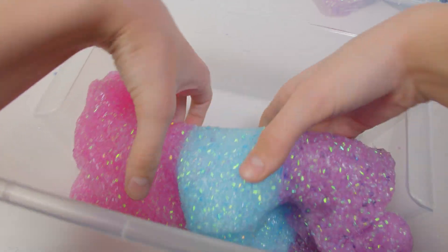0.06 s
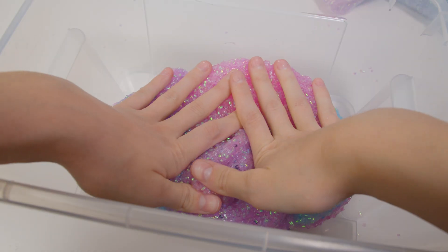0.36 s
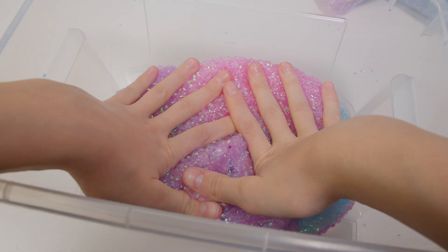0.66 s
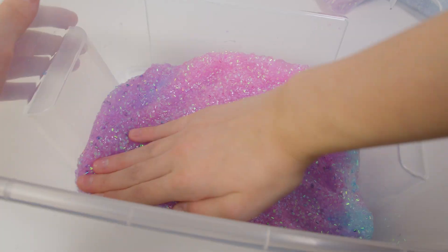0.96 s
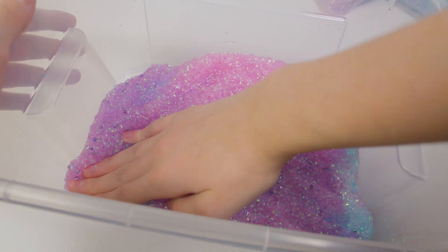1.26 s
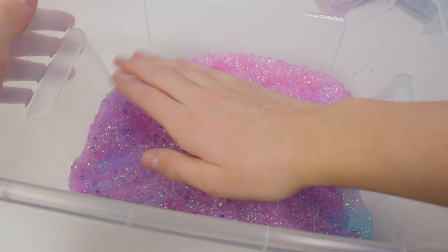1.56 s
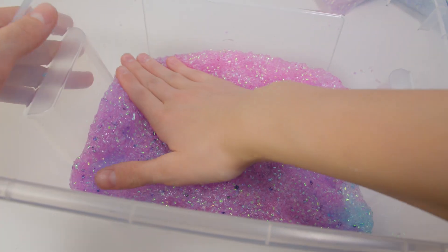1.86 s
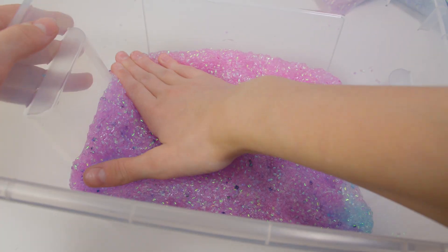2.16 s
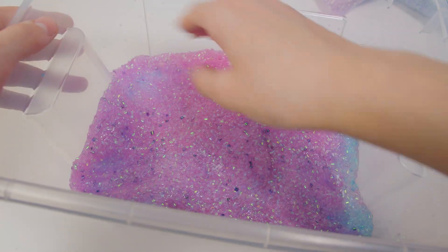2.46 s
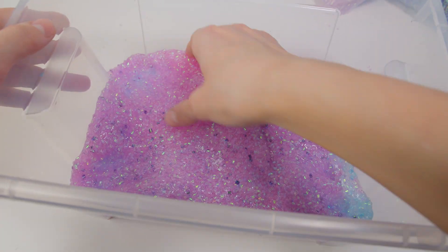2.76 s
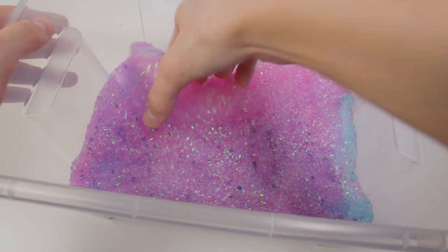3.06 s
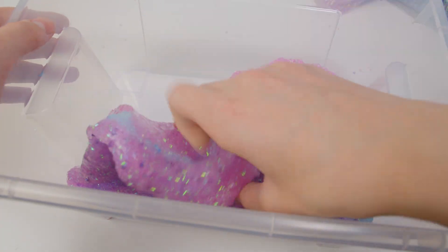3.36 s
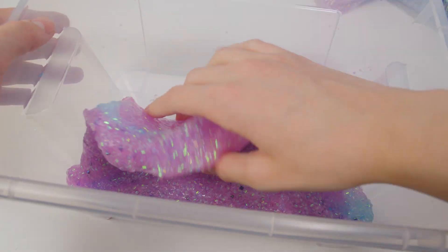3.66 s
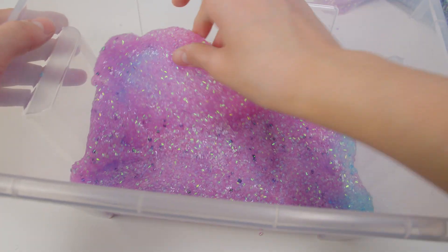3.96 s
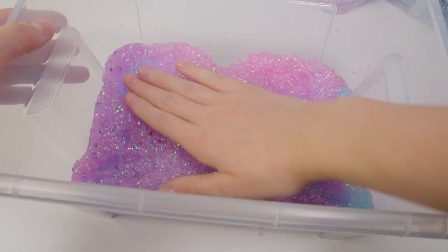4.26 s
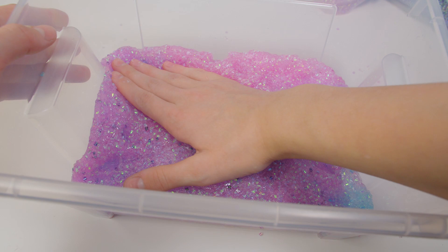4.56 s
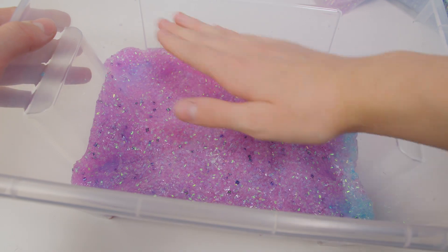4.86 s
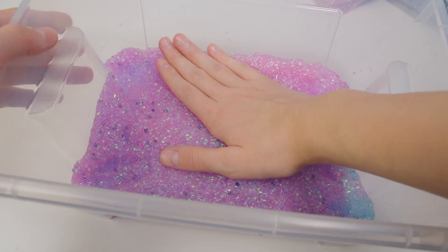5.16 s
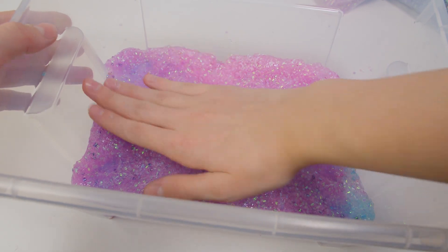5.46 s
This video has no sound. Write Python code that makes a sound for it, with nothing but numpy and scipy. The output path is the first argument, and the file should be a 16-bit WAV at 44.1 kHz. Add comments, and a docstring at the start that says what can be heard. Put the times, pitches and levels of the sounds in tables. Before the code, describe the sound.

Hands press and fold bead-filled slime in a plastic tub, making wet squelches, crisp crackles, sharp little pops and soft thumps.

```python
"""A loud, popping squelch of bead-filled slime, which breaks off abruptly after a quarter second.
Hands then press, fold and peel the slime in a plastic tub, close to a stereo microphone in a small room.
Sticky threads tear in dense crackles, air squelches out of the folds, small bubbles snap and big
pockets pop as resonating cavities. Pushed against the table, the tub booms in its damped modes.
Beneath it all lie a low rumble, a faint hiss and, briefly, a hum."""
import sys
import numpy as np
from scipy import signal
from scipy.fft import rfft, irfft
from scipy.io import wavfile
from scipy.ndimage import uniform_filter1d, map_coordinates

SR = 44100
rng = np.random.default_rng(int(sys.argv[2]) if len(sys.argv) > 2 else 0)


def store_wav(level_fs):
    """Save 16-bit WAV to argv[1]."""
    pcm = np.round(np.clip(np.atleast_2d(level_fs), -1, 1) * 32767)
    wavfile.write(sys.argv[1], SR, pcm.T.astype(np.int16))


N = 251811
TIME = np.arange(N) / SR
FOLD_HZ = 770.8  # pitch of a middling fold, which leaves the squelch bands unshifted

# the flat hand bearing down: (t/s, duration/s, crackle level/dB, moved mass level/dB)
PRESSES = [(0.243, 0.1, -60, -64), (0.359, 0.53, -65.5, -66), (1.02, 0.19, -60, -66.5),
           (1.874, .3, -70, -64), (4.32, .27, -59.5, -54), (5.058, 0.17, -63, -50)]


def undb(db):
    """Amplitude ratio of a level in decibels."""
    return 10 ** (np.asarray(db) / 20)


def unit(x):
    """Normalisation to rms 1."""
    return x / np.sqrt(np.mean(x ** 2))


def band(x, hz, octaves, order=2):
    """Butterworth band-pass around hz, its edges kept below the Nyquist frequency."""
    edges = [min(hz * 2 ** (-octaves / 2), SR / 3), min(hz * 2 ** (octaves / 2), SR / 2 - 1000)]
    return signal.sosfilt(signal.butter(order, edges, "band", fs=SR, output="sos"), x + 1e-18)


def add(track, s, sound):
    """Superposition of a sound on the track at time s."""
    i = max(int(s * SR), 0)
    track[i:i + len(sound)] += sound[:N - i]


def walk(per_s):
    """Slow random modulation: smoothed Gaussian steps, spread near 1."""
    k = int(SR / per_s)
    steps = np.repeat(rng.standard_normal(N // k + 1), k)
    return 1.3 * uniform_filter1d(uniform_filter1d(steps, k), k)[:N]


def swell(s, rise_s, hold_s, fade_s):
    """Exponential growth to 1 at time s, hold and decay; 20 dB per rise or fade time."""
    before, after = np.maximum(s - TIME, 0), np.maximum(TIME - s - hold_s, 0)
    return undb(-20 * (before / max(rise_s, 1e-3) + after / max(fade_s, 1e-3)))


def bend(x, ratio):
    """Resampling scales every frequency by a time-varying ratio."""
    return map_coordinates(x, [np.cumsum(ratio)], mode="mirror")


def air():
    """Ambient noise: rumble and faint hiss, weakly correlated between the channels."""
    # spectrum of still room air: (f/Hz, relative spectral level/dB)
    spectrum = [(12, -3), (22, 11.5), (35, -9.5), (50, 0), (80, -15), (130, -17.5), (300, -29), (700, -36),
                (2000, -38.5), (7500, -46), (10000, -45), (16000, -45)]
    hz, db = np.transpose(spectrum)
    colour = undb(np.interp(np.log(np.fft.rfftfreq(N, 1 / SR) + 1), np.log(hz), db))
    noise = rng.standard_normal((2, N)) + 0.18 * rng.standard_normal(N)
    return undb(-45) * unit(irfft(rfft(noise) * colour, N))


def room(x, wet_db, t60_low=0.25, t60_high=0.27, near_db=-13, near_s=0.0029, bass_db=6, break_s=.2345):
    """Convolution with a stereo impulse response: direct sound, tub-wall reflections, reverberation."""
    t = TIME[:SR // 2]
    noise = rng.standard_normal((2, len(t)))
    low, bass, full = (signal.sosfilt(signal.butter(1, hz, fs=SR, output="sos"), noise)
                       for hz in (1800, 260, 12000))
    low_tail = (low + undb(bass_db) * bass) * undb(-60 * t / t60_low)
    high_tail = (full - low) * undb(-60 * t / t60_high)
    tail = (low_tail + high_tail) * (t > .004)
    near = rng.standard_normal((2, len(t))) * np.exp(-t / near_s) * (t > .0006)
    response = (undb(wet_db) * unit(tail) + undb(near_db) * unit(near)) / np.sqrt(len(t))
    response[0, :2] += [0.1, 0.9]  # the direct sound reaches the left a fraction of a sample later
    response[1, 0] += 1
    first = TIME < break_s  # the opening scene breaks off here, echo and all, and the next scene begins
    echo = lambda part: signal.fftconvolve(part[None], response, axes=1)[:, :N]
    return echo(x * first) * first + echo(x * ~first)


def hum(glide_hz_per_s=28):
    """Frequency modulation: a faint low tone wavers and rises a little as it comes and goes."""
    # swells of the hum: (t/s, duration/s, f/Hz at time t, level/dB)
    tones = [(3.58, 0.22, 204, -54.5), (4.3, 0.19, 198.6, -64)]
    out = 0
    for s, length_s, hz, db in tones:
        pitch = (hz + glide_hz_per_s * (TIME - s)) * (1 + .01 * walk(24.6))
        tone = unit(np.sin(2 * np.pi * np.cumsum(pitch) / SR))
        out = out + undb(db) * swell(s, rise_s=0.31, hold_s=length_s, fade_s=0.11) * tone
    return out


def tub(onset_s=0.018):
    """Modal vibration: a soft push through the slime excites the tub's damped modes."""
    # modes of the tub: (f/Hz, relative level/dB, T60/s)
    modes = [(80.4, 2.5, 0.19), (108.9, -9.5, 0.13), (175.1, -9.5, 0.2), (245.4, -4.5, 0.077),
             (365, -18, 0.084)]
    # pushes against the table: (t/s, level/dB)
    thumps = [(0.016, -27), (0.127, -28.5), (0.201, -45), (1.414, -36), (1.828, -44), (3.011, -29),
              (3.211, -41), (4.012, -49), (4.241, -45), (4.33, -46), (4.679, -51), (5.369, -35.5),
              (5.459, -39)]
    t = TIME[:SR // 2]
    ring = sum(undb(db - 60 * t / t60) * np.sin(2 * np.pi * hz * t) for hz, db, t60 in modes)
    ring = ring * (1 - np.exp(-t / onset_s))
    out = np.zeros(N)
    for s, db in thumps:
        add(out, s, undb(db) * ring / np.abs(ring).max())
    return out


def bubble(hz, ring_ms, glide=0.044):
    """Cavity resonance: the oscillation swells and rings out, rising slightly in pitch; peak 1."""
    t = TIME[:SR // 24]
    age = t * 1000 / ring_ms
    ring = age * np.exp(-age) * np.sin(2 * np.pi * hz * t * (1 + glide * np.tanh(age / 10)))
    return ring / np.abs(ring).max()


def rip(hz, ring_ms, octaves, order=2):
    """Rupture of a film: an impulse, then the torn edge flutters as decaying band-limited noise."""
    t = TIME[:SR // 24]
    fade = np.exp(-t * 1000 / ring_ms)
    flutter = rng.standard_normal(len(t)) * fade
    flutter[0] = 1.83  # the impulse
    burst = band(flutter, hz, octaves, order=order)
    return .5 * burst * np.sqrt(np.sum(fade ** 2) / np.sum(burst ** 2))


def faint_snaps(per_s=24, centre_hz=6760, ring_ms=0.63, knock_db=-5.5, max_count=32):
    """A random point process: rows for snaps(), scattered through each press above its crackle level."""
    rows = []
    for s, length_s, crackle_db, _ in PRESSES:
        draws = np.column_stack([rng.random(max_count), rng.uniform(-2.17, 2.15, (max_count, 2))])
        for when, size, pitch in draws[:round(per_s * length_s)]:
            db = crackle_db + 18 + 7 * size
            rows.append((s + when * length_s, db, centre_hz * 2 ** (0.57 * pitch), ring_ms, knock_db))
    return rows


def snaps():
    """Broadband transients: small taut bubbles burst with a bright tick and a dull knock; a few ring."""
    # the clearest bursts: (t/s, level/dB, f/Hz, decay time/ms, knock level/dB re tick)
    bursts = [(.2325, -22, 10600, 1.2, -21), (.2525, -32.5, 8700, 2.1, -6), (.403, -37, 10000, 0.59, -7),
              (.415, -53, 5000, 2.2, 15), (.577, -46.5, 7000, 0.99, 0), (.644, -36, 9070, 0.41, -21),
              (.817, -32.5, 8400, .74, -18), (.8838, -27, 6500, 1.4, -1), (1.001, -42.5, 9000, 0.55, 4),
              (1.038, -25.5, 9000, 1.5, -15), (1.116, -23.5, 10000, 2.8, -6.5),
              (1.155, -24.5, 6900, 0.59, -20), (1.767, -34.5, 7240, 0.42, -15),
              (1.886, -29, 7450, 0.63, -12.5), (1.927, -41, 6970, .7, -19), (1.989, -41, 8000, .55, -20),
              (2.047, -38.5, 7640, 0.4, -15), (2.194, -44, 6960, .45, 0.5), (2.665, -34, 6030, 1.3, -15),
              (2.7115, -20, 7700, 0.74, -29), (2.811, -25, 8800, .99, -11), (2.8313, -19, 10280, 0.67, -4),
              (3.032, -15, 10500, 0.394, -29), (3.08, -24, 7060, 1.8, 1), (3.1058, -14, 7850, 0.86, -5),
              (3.19, -30, 6010, 1, -5), (3.422, -34.5, 9800, 1.8, -26), (3.95, -31, 9000, 0.62, -16),
              (4.382, -35.5, 5953, 1.2, -22), (4.407, -30.5, 9080, 3.1, -32),
              (4.418, -31.5, 9500, 1.5, -34), (4.4655, -25, 8220, 1.9, -40), (4.5, -30, 9500, 0.76, -21),
              (4.521, -34, 8590, 1.24, -19), (4.581, -33, 7900, 0.48, -11.5),
              (4.611, -29.5, 9517, 0.77, -23), (4.639, -37.5, 7000, 0.62, -3),
              (4.7635, -22, 10090, 0.95, -22), (5.105, -3.5, 9436, 0.77, -28),
              (5.3252, -23, 5920, 1.1, -15), (5.35, -20.5, 4935, 3.9, -32), (5.4563, -31, 4502, 0.49, -20),
              (5.653, -26, 7200, 2.27, -35)]
    # tiny bubbles with a clear pitch: (t/s, level/dB, f/Hz, decay time/ms)
    blips = [(2.843, -35.5, 3580, 2.2), (2.989, -38, 3805, 1.6), (3.151, -35, 3800, 1.6),
             (4.618, -51.5, 1780, 1.3)]
    out = np.zeros(N)
    for s, db, hz, ring_ms, knock_db in list(bursts) + faint_snaps():
        add(out, s, undb(db) * rip(hz, ring_ms, octaves=1.14))
        add(out, s, undb(db + knock_db) * rip(2200, 1.4 * ring_ms, octaves=4.84))
    for s, db, hz, ring_ms in blips:
        add(out, s, undb(db) * bubble(hz, ring_ms))
    return out


def pops():
    """Impulsive excitation: a bursting air pocket rings, with a flap of loose slime and a wet edge."""
    # air pockets: (t/s, level/dB, f/Hz, decay time/ms, relative level of the wet edge/dB)
    pockets = [(.075, -17, 670, 1.25, -11), (.083, -11, 690, 0.54, -22), (.125, -6, 676, 0.97, -9),
               (.176, -13.5, 580, 1.14, -1.5), (.216, -12.5, 503, 0.27, -10), (.377, -47.5, 870, 0.8, -1),
               (.826, -37, 1530, 0.44, 0), (2.486, -40.5, 880, .79, -6), (2.552, -31.5, 880, 1.5, 1),
               (2.5573, -24, 613, 1.2, -1), (2.712, -35, 976, 2.8, -21), (2.729, -37, 1110, 3.2, -17),
               (2.75, -31.5, 1030, 1.7, -9), (2.766, -46, 1235, 1.3, -12.5),
               (3.0211, -22, 520.4, 0.79, -24), (3.2141, -9, 747, 0.61, -34),
               (3.5453, -29.5, 594.4, 0.96, -36), (4.007, -23.5, 662.6, 1.05, -25),
               (4.346, -40.5, 641.5, 0.67, 1.5), (5.036, -32, 948, 1.15, -18),
               (5.107, -31.5, 1141, 0.51, -18), (5.164, -35.5, 1013, 1.24, -16),
               (5.324, -33, 940, 1.15, -13), (5.457, -20.5, 429.7, 0.26, -10.5),
               (5.637, -44.5, 811, 4, -21)]
    out = np.zeros(N)
    for s, db, hz, ring_ms, edge_db in pockets:
        add(out, s, undb(db - 0.5) * bubble(hz, ring_ms))
        add(out, s, undb(db - 2.5) * rip(hz * 0.72, 4.1 * ring_ms, octaves=2.54, order=4))  # flap
        add(out, s, undb(db + edge_db) * rip(2220, 1.64, octaves=1.75))
    return out


def hollow(x):
    """Cavity modes: the air between hand and tub adds narrow resonances."""
    # resonances of the hollow: (f/Hz, bandwidth/Hz, gain/dB)
    modes = [(1559.7, 70, 4), (2020, 43, -14.5), (3125, 67, -1), (3760, 14, -4.5), (4175, 44, -6.5),
             (5320, 170, -16.5)]
    return x + sum(undb(db) * signal.lfilter(*signal.iirpeak(hz, hz / width, fs=SR), x)
                   for hz, width, db in modes)


def grains(bands, per_s, spread_db, octaves):
    """Shot noise: random impulses, per_s in each band, ring briefly near the band's centre; rms 1."""
    out = 0
    for hz, db in bands:
        size = undb(spread_db * np.minimum(rng.standard_exponential(N), 4)) * rng.choice([-1, 1], N)
        clicks = size * (rng.random(N) < per_s / SR)
        # the hand feeds energy in steadily, so the bursts of each moment share it
        clicks = clicks / np.sqrt(uniform_filter1d(clicks ** 2, SR // 40) + 1e-3)
        out = out + undb(db) * unit(band(clicks, hz, octaves, order=3))
    return unit(out)


def effort(air_lag_s=0.0024, mass_lag_s=0.0052):
    """Incoherent sources add in power: envelopes of tearing, air flow and moved mass, and fold pitch."""
    # strokes of the hand that pull or fold the slime:
    # (t/s, rise/s, hold/s, fade/s, tearing level/dB, air level/dB, mass level/dB, f/Hz of the fold)
    strokes = [(0, 0.026, 0.062, 0.049, -60.5, -33, -34.5, 711),
               (0.083, 0.073, 0.13, 0.018, -54, -35.5, -35, 668.6),
               (1.391, 0.055, 0.0085, 0.22, -49, -47.5, -49, 762.5),
               (1.817, 0.042, 0.011, 0.0788, -57.5, -39.5, -42, 790.4),
               (2.347, 0.052, 0.018, 0.083, -42.5, -49, -56, 759.5),
               (2.375, 0.0349, 0.0078, 0.0801, -41, -37, -41.5, 742.7),
               (2.553, 0.0075, .005, 0.085, -51.5, -41, -39.5, 707.5),
               (2.725, 0.078, 0.048, 0.075, -45, -36, -47, 899.2),
               (2.845, 0.067, 0.013, .16, -45, -54.5, -60.5, 860),
               (2.973, .05, 0.039, 0.14, -39.5, -37.5, -43, 683.5),
               (3.11, .09, 0.024, .1, -38, -39, -42.5, 730.7),
               (3.21, 0.0394, 0.021, 0.097, -44, -41.5, -41.5, 801),
               (3.435, 0.014, .005, 0.055, -50, -47, -46.5, 753.7),
               (3.539, 0.0075, 0.0025, 0.11, -71.5, -52, -44, 618),
               (3.667, 0.015, 0.0035, 0.025, -51, -53, -57, 921),
               (3.972, 0.18, 0.051, 0.065, -51, -54, -50, 681.6),
               (4.017, 0.038, 0.028, .1, -53.5, -36, -34, 638),
               (4.162, 0.0797, 0.0095, 0.115, -60, -64.5, -48, 647),
               (4.776, 0.033, 0.036, 0.048, -40.5, -48.5, -52, 738.6),
               (4.812, 0.052, 0.0087, .075, -54, -32.5, -40.5, 772),
               (4.948, .04, 0.0056, 0.088, -64, -54, -44.5, 628.5),
               (5.034, 0.016, 0.0057, 0.088, -58, -45.5, -58, 904),
               (5.165, 0.011, 0.0036, 0.057, -57.5, -48.5, -40, 723.5),
               (5.335, 0.032, 0.021, 0.069, -39, -41, -43.5, 694.4),
               (5.449, 0.0056, .003, .11, -61, -49, -38.5, 678),
               (5.648, 0.067, 0.006, 0.07, -58.5, -49, -52, 745)]
    # trapped air hissing out of a broken bubble: (t/s, level/dB)
    vents = [(0.883, -64.5), (1.115, -47), (4.465, -59), (5.104, -50.5), (5.653, -52.5)]
    tear, air_flow, mass, fold_shift = np.zeros((4, N))
    for s, rise_s, hold_s, fade_s, tear_db, air_db, mass_db, fold_hz in strokes:
        # threads tear first, then air escapes, then the mass follows
        tear += (undb(tear_db) * swell(s, rise_s, hold_s, fade_s)) ** 2
        puff = (undb(air_db) * swell(s + air_lag_s, rise_s, hold_s, fade_s)) ** 2
        mass += (undb(mass_db) * swell(s + mass_lag_s, rise_s, hold_s, fade_s)) ** 2
        air_flow += puff
        fold_shift += puff * (fold_hz - FOLD_HZ)
    for s, length_s, crackle_db, mass_db in PRESSES:
        weight = swell(s, rise_s=0.045, hold_s=length_s, fade_s=.15)
        tear += (undb(crackle_db) * weight) ** 2
        air_flow += (undb(crackle_db - 4) * weight) ** 2
        mass += (undb(mass_db) * weight) ** 2
    for s, db in vents:
        tear += (undb(db) * swell(s, rise_s=.005, hold_s=0.019, fade_s=0.1)) ** 2
    return np.sqrt(tear), np.sqrt(air_flow), np.sqrt(mass), FOLD_HZ + fold_shift / air_flow


def kneading(smack_air_share=0.31, drift_octaves=.14):
    """Modulated shot noise: threads tear, skin smacks, air squelches and the slime's mass shifts."""
    # band centres of those four sources, in that order: (f/Hz, relative level/dB)
    thread_bands = [(5500, -1.5), (6900, -6), (9100, 0.5), (10900, -0.5), (14000, -8.5)]
    smack_bands = [(1800, -3), (2300, 0), (3200, -2.5), (4100, 2.2)]
    squelch_bands = [(470, -1.5), (600, 5), (760, 4), (960, 5.5), (1220, -8), (1520, -0.5)]
    mass_bands = [(81, -3), (125, -6.5), (190, 0.5), (255, -3.5), (355, -7)]
    tear, air_flow, motion, fold_hz = effort()
    contact = tear ** (1 - smack_air_share) * air_flow ** smack_air_share  # where tearing meets air
    per_s = 450 + 1200 * np.sqrt(tear / tear.max())  # harder work tears more threads
    slip = undb(2.03 * walk(170) + 0.68 * walk(55))  # the slime lets go in jerks
    drift = 2 ** (drift_octaves * walk(18))  # the gaps under the fingers keep changing size
    crackle = tear * undb(-2.5) * grains(thread_bands, per_s, spread_db=1.5, octaves=0.43)
    smacks = contact * undb(-6) * bend(grains(smack_bands, per_s, spread_db=0, octaves=0.37), drift)
    bubbling = grains(squelch_bands, per_s=700, spread_db=1.5, octaves=0.59)
    squelches = air_flow * undb(-2.96) * bend(bubbling, fold_hz / FOLD_HZ)
    mass = motion * undb(-5) * grains(mass_bands, per_s=400, spread_db=1.5, octaves=0.46)
    return slip * (hollow(crackle + smacks) + squelches) + mass


def scene():
    """Superposition: the sources reverberate in one room, slightly louder on the right, over its noise."""
    slime = room(kneading(), wet_db=-13) + room(pops(), wet_db=-9.5) + room(snaps(), wet_db=-9.5)
    lows = room(tub() + hum(), wet_db=-11.5)
    return (slime + lows) * undb([[-.3], [.3]]) + air()


def record(dry, top_hz=15800):
    """Band limiting: a steep elliptic low-pass removes the highest treble."""
    return signal.sosfilt(signal.ellip(8, .2, 70, top_hz, fs=SR, output="sos"), dry)


dry = scene()
out = record(dry)
store_wav(out)
```